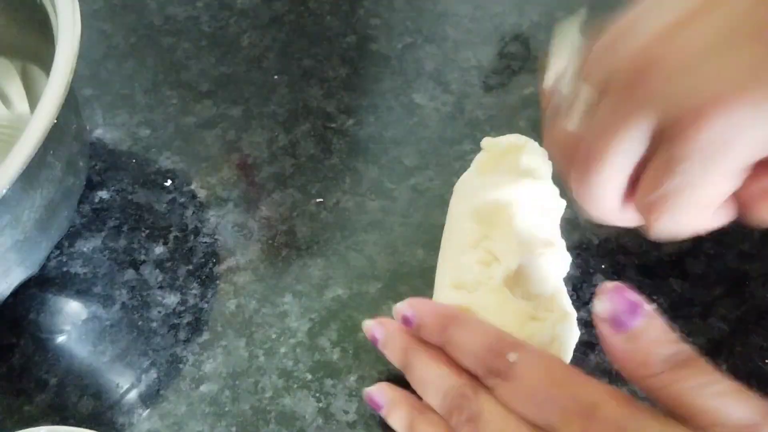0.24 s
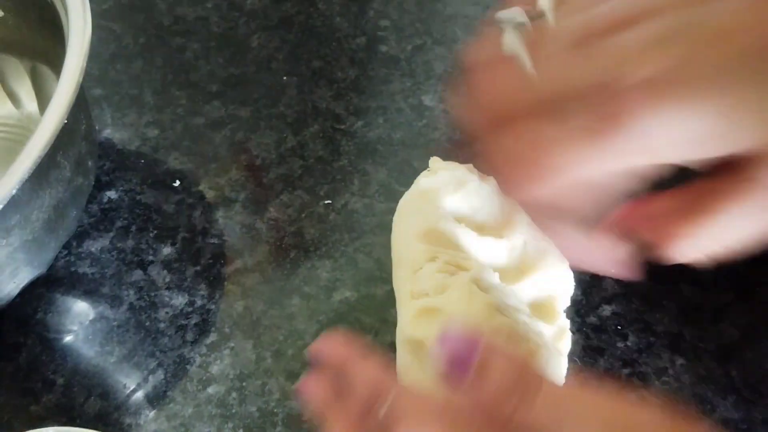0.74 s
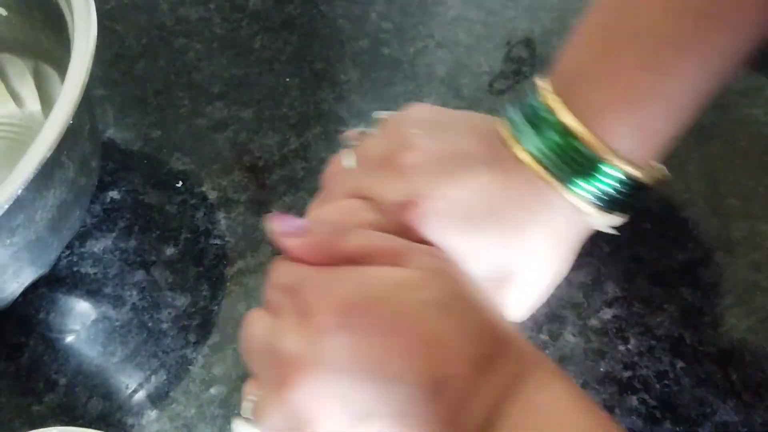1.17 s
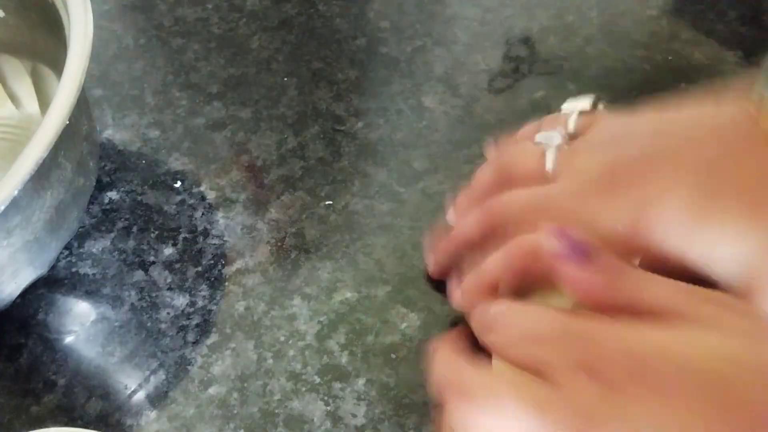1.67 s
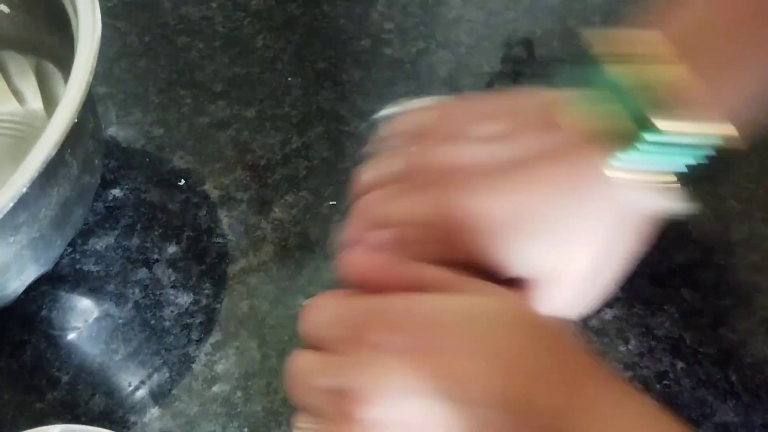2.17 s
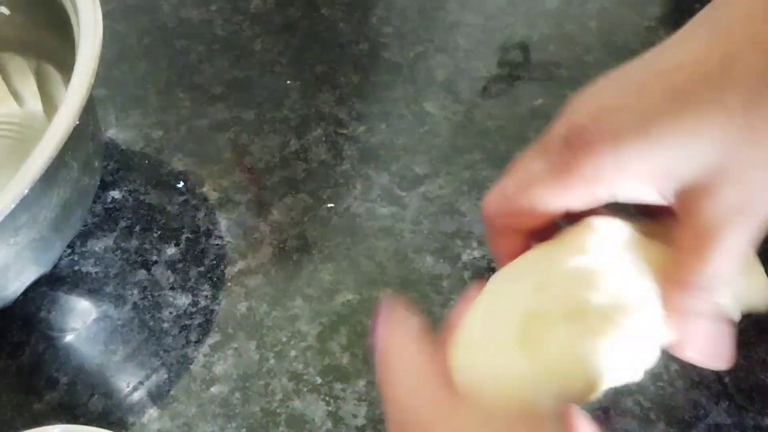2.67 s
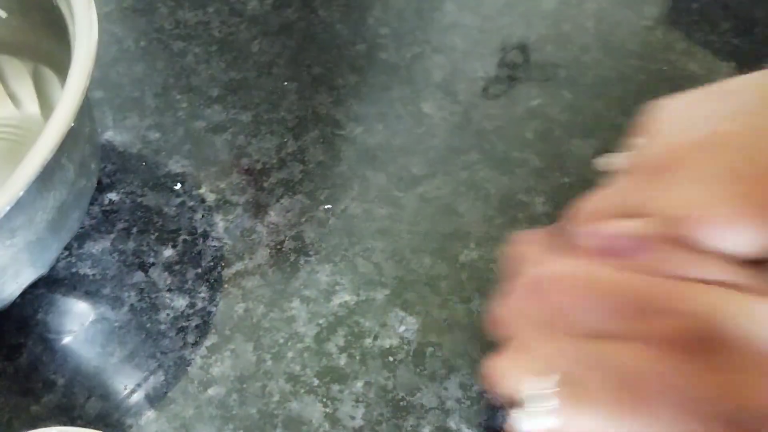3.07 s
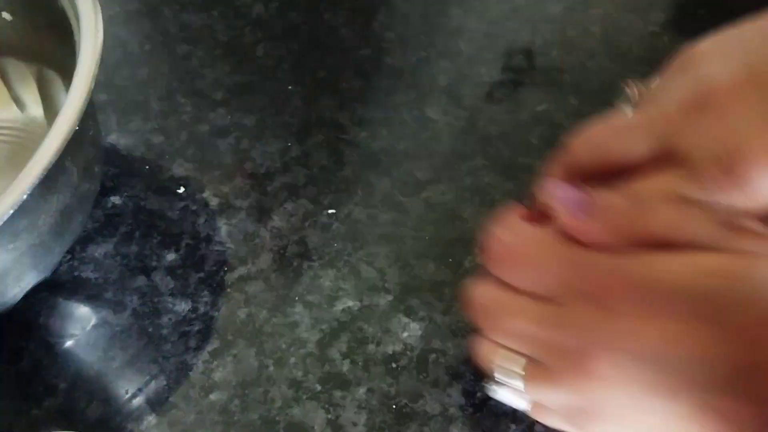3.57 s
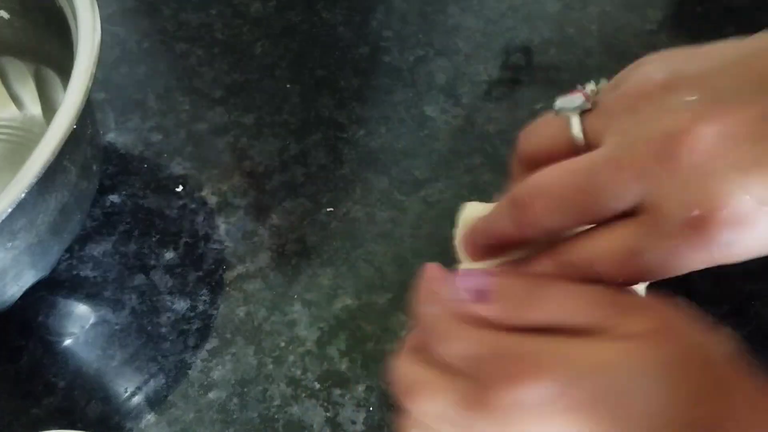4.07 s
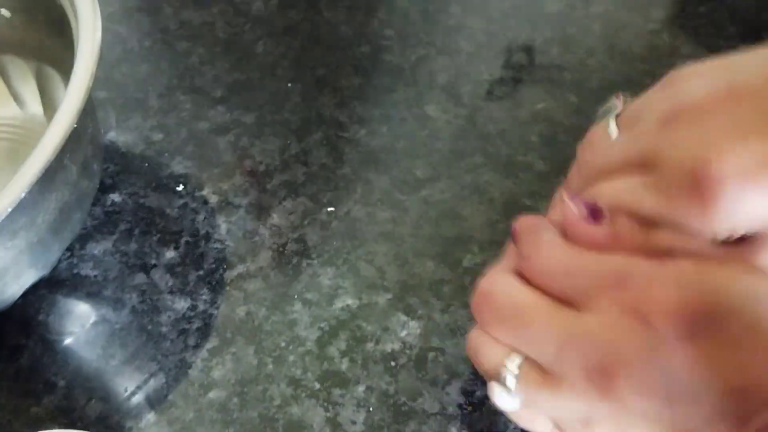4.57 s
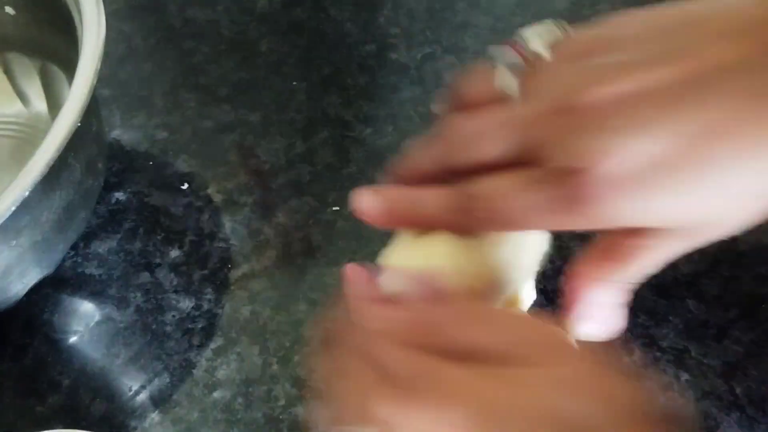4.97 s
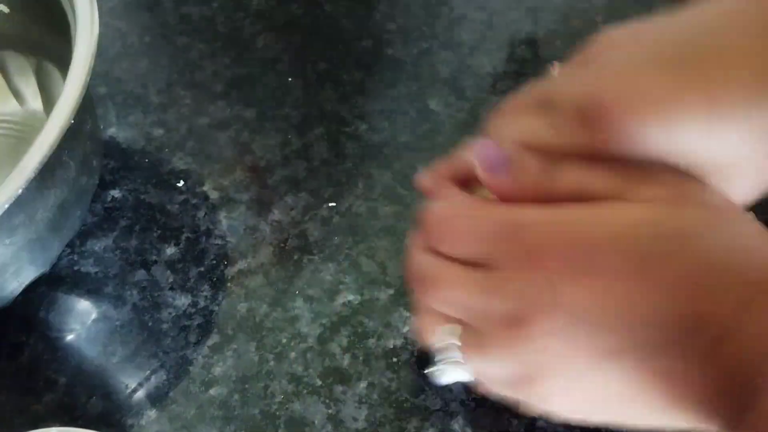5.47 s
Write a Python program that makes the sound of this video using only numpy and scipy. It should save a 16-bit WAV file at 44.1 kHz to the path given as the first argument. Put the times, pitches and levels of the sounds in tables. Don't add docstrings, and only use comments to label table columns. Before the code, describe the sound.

A close phone recording in a small, hard kitchen. A low fan drone and soft treble hiss run throughout, the rumble swelling slightly as hands press dough on a stone counter. Glass bangles clash at once with a bright, brittle clink, then tick lightly until a very hard, overloaded strike at 0.7 seconds. A small hard tick, a finger ring on stone, comes at about 0.97. From 1.24 to 1.38 a dense rattle of rebounds includes a lower metallic ring. Softer clicks follow, then a strong clash with rebounds at 2.07 to 2.15, and another at 2.87 with a touch of metal. After a sparser gap, clinks cluster from 3.45 to 4.0, leading to a sharp strike at 4.07. Quieter clicks continue irregularly at 4.5 to 5.1, with a last small cluster at 5.5 to 5.7. Each dies quickly into grainy shimmer and short reflections; dull knocks stay faint.

```python
import sys
import numpy as np
from scipy import signal
from scipy.fft import rfft, irfft, next_fast_len
from scipy.io import wavfile
from scipy.ndimage import uniform_filter1d

SR = 44100
rng = np.random.default_rng(int(sys.argv[2]) if len(sys.argv) > 2 else 0)


def amplitude_ratio(level_db):
    exponent = np.asarray(level_db, float) / 20
    return 10 ** exponent


def to_wav(sig):
    pcm = np.clip(np.atleast_2d(sig), -1, 1) * 32767
    pcm = np.round(pcm).astype(np.int16)
    wavfile.write(sys.argv[1], SR, pcm.T)


N = 252714

# (frequency [Hz], level [dB])
GLASS_MODES = [(2590, -53), (4400, -25.5), (5110, -28.5), (6850, -7.5), (7780, 1), (9540, -4),
               (11500, -5.5), (13300, -15.5), (15600, -17), (16100, -37), (16500, -47)]


def evened(x):
    return x / np.sqrt(np.mean(x ** 2) + 1e-20)


def read(points, hz):
    f, value = np.transpose(points)
    return np.interp(np.log(hz + 1), np.log(f + 1), value)


def add(mix, s, sound):
    part = mix[round(s * SR):][:len(sound)]
    part += sound[:len(part)]


def ring(hz, db, t60, phase, seconds=.15, rise=.0006):
    t = np.arange(int(seconds * SR))[:, None] / SR
    modes = amplitude_ratio(db - 60 * t / t60) * np.sin(2 * np.pi * (hz * t + phase))
    onset = 1 - np.exp(-(t[:, 0] / rise) ** 2)
    return modes.sum(1) * onset


def hiss():
    # (frequency [Hz], density [dB per Hz])
    spectrum = [(150, -45), (250, -14), (320, -1), (450, -3), (700, -4), (1400, -10), (3000, -15),
                (4200, -14.5), (5500, -9), (6300, -1.5), (8200, 0.5), (10200, -1.5), (12500, -14),
                (14500, -20)]
    level_db, patch_db = -45, 1.1
    frames, hz = N // 128 + 5, np.fft.rfftfreq(512, 1 / SR)
    a, b, patches = rng.standard_normal((frames, 257, 3)).T
    patches = evened(uniform_filter1d(uniform_filter1d(patches, 8, 0), 20, 1))
    z = (a + 1j * b) * amplitude_ratio(read(spectrum, hz)[:, None] + patch_db * patches)
    noise = signal.istft(z, nperseg=512, noverlap=384)[1][:N]
    return amplitude_ratio(level_db) * evened(noise)


def hum():
    # (frequency [Hz], width [Hz], level [dB])
    lines = [(29.8, 18, -61.5), (63.4, 8.2, -63.5), (102.6, 10.8, -56), (151.5, 15, -65.5),
             (168.6, 24, -63), (196.3, 16, -60), (229, 13, -75.5), (249.2, 7.4, -69.5), (319.5, 7.2, -70.5)]
    size = next_fast_len(N)
    hz, noise = np.fft.rfftfreq(size, 1 / SR), rfft(rng.standard_normal(size))
    drone = np.zeros(N)
    for f, width, db in lines:
        resonance = 1 / (1 + (2 * (hz - f) / width) ** 2)
        drone += amplitude_ratio(db) * evened(irfft(noise * resonance, size)[:N])
    return drone


def kneading_swell():
    # (time [s], level [dB])
    pressure = [(0.0, -46.5), (0.06, -48), (0.17, -51.5), (1.21, -53), (1.28, -48), (1.6, -55), (1.76, -51),
                (1.98, -53), (2.01, -47.5), (2.41, -53.5), (2.86, -51.5), (2.87, -48.5), (3.03, -53.5),
                (4.69, -53.5), (4.76, -56.5), (5.14, -51.5), (5.25, -56.5), (5.73, -51)]
    s, db = np.transpose(pressure)
    return amplitude_ratio(0.9 * (np.interp(np.arange(N) / SR, s, db) - db.mean()))


def knock(row, luck):
    s, peak_db, tone_hz, breadth_db = row
    pick, place, phase, when, force = luck
    glass_t60, crack_t60, crack_db = .03, .0045, 3
    hz = 4500 + 11500 * (np.arange(len(place)) + place) / len(place)
    above, below = np.clip((hz - 9000) / 2500, 0, 1), np.clip((7000 - hz) / 1500, 0, 1)
    db = 1.256 * read(GLASS_MODES, hz) - 8 * pick
    db += 0.72 * breadth_db * above + (11.5 + 0.86 * breadth_db) * below
    sound = np.zeros(int(.15 * SR))
    for k in range(3):
        glass = ring(hz[k::3], db[k::3], 0.51 * glass_t60 * (.5 + when[k::3]), phase[k::3], .04)
        crack = ring(hz[k::3], db[k::3] + crack_db, crack_t60, force[k::3], .015, 0.0011)
        add(glass, 0, crack)
        main_hz = tone_hz * (1 + 0.039 * k * (pick[k:k + 1] - .5))
        glass += ring(main_hz, 1.5 - 3 * k, 0.63 * glass_t60, 0, .04)
        bounces = np.append(0, when[k:15:3] ** 1.5)
        pushes = np.append(.7, force[k:15:3] * (1 - 0.57 * when[k:15:3]))
        for after, push in zip(bounces, pushes):
            add(sound, .35 * glass_t60 * after + .0006 * k, push * glass)
    return max(s - .0009, 0), amplitude_ratio(peak_db) * sound / abs(sound).max()


def rustle(near):
    level = abs(uniform_filter1d(near ** 2, 1500, origin=400)) ** 0.3
    band = signal.butter(2, [1200, 6500], "band", fs=SR, output="sos")
    return amplitude_ratio(-39.5) * level * evened(signal.sosfilt(band, rng.standard_normal(N)))


def shimmer(near):
    level_db, t60 = -15.5, 0.34
    keep = amplitude_ratio(-2 * 60 / (t60 * SR))
    level = np.sqrt(signal.lfilter([1 - keep], [1, -keep], near ** 2))
    bursts = rng.exponential(1, N // 64 + 1).repeat(64)[:N]
    grit = rng.standard_normal(N) * bursts
    glassy = irfft(rfft(grit) * amplitude_ratio(read(GLASS_MODES, np.fft.rfftfreq(N, 1 / SR))), N)
    return amplitude_ratio(level_db) * level * evened(glassy)


def kitchen(x):
    # (frequency [Hz], t60 [s])
    decay = [(2000, 0.56), (5280, 0.28), (13900, 0.27)]
    turn_s = 0.24
    out, turn = np.zeros(N), np.arange(N) / SR * 2 * np.pi / turn_s
    for k in range(3):
        taps = np.zeros(SR // 2)
        at = np.arange(120, len(taps) - 20, 20)
        taps[at + rng.integers(0, 20, len(at))] = rng.choice([-1., 1.], len(at))
        hz, t, z = signal.stft(taps, SR, nperseg=128)
        fade = amplitude_ratio(-60 * t / read(decay, hz)[:, None])
        tail = signal.istft(z * fade, SR, nperseg=128)[1]
        share = np.sqrt((1 + np.cos(turn + k * 2 * np.pi / 3)) / 3)
        out += signal.fftconvolve(x * share, tail / np.linalg.norm(tail))[:N]
    return out


def rim(row, luck):
    # (pitch ratio [1], level [dB], share of t60 [1])
    metal = [(.975, -8, .5), (1, -2, 1), (1.014, -5.5, .8), (1.04, -2, .6), (1.08, -19, .7)]
    s, peak_db, hz, t60, upper_db = row
    upper_hz = 11220 * np.array([1, .993])
    ratio, db, share = np.transpose(metal)
    sound = ring(hz * ratio, db - 4 * luck[0, :len(db)], t60 * share, luck[1, :len(db)], rise=0.0018)
    sound += ring(upper_hz, upper_db, 0.5 * t60, luck[2, :2])
    return s - .0004, amplitude_ratio(peak_db + 4.0) * sound / abs(sound).max()


def thump(hz, spread, t60, luck):
    sound = ring(hz * (1 + spread * (luck[0] - .5)), 0, t60, luck[1], .08, 1.1 / hz)
    return sound / abs(sound).max()


def lull_slips(mid, count=24):
    length, turn, quiet_rms = .045, .5, .008
    slips = []
    for when, where, wide in rng.random((count, 3)):
        start, low_hz = when * (N / SR - .1), 5500 * 2.3 ** where
        if mid[round(start * SR):][:round(length * SR)].std() < quiet_rms:
            slips.append((start, length, low_hz, low_hz + 1500 + 1500 * wide, turn))
    return slips


def scene():
    # (time [s], peak [dB], loudest glass tone [Hz], breadth [dB])
    strikes = [(.0004, -14.5, 7370, -12), (0.018, -3.5, 8440, -2), (0.3093, -17, 8000, 10),
               (0.447, -17, 7820, 4), (.641, -17.5, 8230, 11), (0.7156, 2, 7645, 0),
               (1.1119, -15, 9600, -1), (1.2444, -13, 9700, 6), (1.3764, -12, 8680, 6),
               (1.632, -19, 8700, 10), (1.7404, -17.5, 8030, -5), (1.9814, -18.5, 6820, 4),
               (2.0665, -4.5, 11000, 4), (2.5084, -22, 8300, 2), (2.5725, -15.5, 11400, 4.5),
               (2.782, -17, 7470, 3.5), (2.8748, -6, 9010, 3), (3.4538, -11, 8210, -10),
               (3.53, -14, 7980, 3), (3.656, -20, 11470, 7), (3.869, -20, 9570, 3),
               (3.916, -15.5, 8260, -2), (3.9952, -21.5, 7480, 4), (4.0674, -3, 8170, 3),
               (4.5356, -17, 7920, -11), (4.6271, -17, 7780, -2), (4.9165, -16, 7450, -11),
               (5.1082, -22.5, 7170, 5), (5.5147, -15, 7930, -20), (5.608, -15, 8620, 11)]
    # (time [s], peak [dB], loudest glass tone [Hz], breadth [dB])
    rebounds = [(.0219, -8.5, 7650, -25), (0.04, -30, 8440, 3), (.325, -23.5, 7760, 3),
                (0.367, -24, 7500, -1), (0.7243, -5, 7750, -6), (1.2471, -5.5, 9950, 4.5),
                (1.257, -10, 7600, 7), (1.269, -4, 8400, 7), (1.279, -13, 11100, 10), (1.281, -8, 7800, 5),
                (1.2919, -5.5, 7750, 8), (1.2987, -2, 7300, 3), (1.3096, -7, 7700, 5),
                (1.3162, -13.5, 8370, -9), (1.991, -29, 7650, 3), (2.0058, -21, 7700, 6),
                (2.018, -18.5, 7400, 3), (2.03, -30, 7600, 15), (2.071, -6.5, 8690, -1),
                (2.0827, -26, 11300, 7), (2.097, -25, 7900, 7), (2.108, -18, 11200, 6),
                (2.117, -10.5, 11060, 1), (2.13, -18, 8200, 3), (2.14, -7.5, 7980, -1),
                (2.1475, -17, 7770, -5), (2.8807, -7.5, 10920, 13), (3.673, -26.5, 8450, 2),
                (3.9422, -20.5, 8100, -8), (5.6127, -12.5, 11230, 2)]
    # (time [s], peak [dB], loudest glass tone [Hz], breadth [dB])
    ticks = [(.2239, -25.5, 7900, -5), (0.251, -23, 7980, -3), (.356, -22.5, 7830, -4),
             (.3794, -43, 8140, 4), (0.419, -23, 7950, 0), (0.6853, -26, 8700, 6), (.905, -23.5, 7800, 3),
             (.9397, -27, 8100, 8), (1.0301, -32.5, 8300, 5), (1.0912, -22, 9870, -2),
             (1.6494, -30, 9300, -5), (1.679, -28, 8100, 2), (1.722, -22, 9100, 2), (1.8257, -27, 8480, 2),
             (2.4885, -22.5, 7560, 2), (2.554, -23.5, 8560, 7), (2.6763, -30, 8300, 2),
             (3.112, -24, 9220, 0), (3.3505, -23.5, 7460, 7), (3.4846, -29, 8000, -1),
             (4.036, -25.5, 8340, 7), (4.398, -30.5, 9500, -6), (4.587, -29, 8100, -14),
             (4.6594, -37, 8600, -4), (5.042, -23, 7940, -19), (5.138, -22.5, 9330, 5),
             (5.571, -27, 7650, -12), (5.602, -25, 11200, -2), (5.669, -24.5, 7930, -8),
             (5.6925, -24.5, 7900, -7)]
    # (time [s], peak [dB], pitch [Hz], t60 [s], upper partial [dB])
    rims = [(0.018, -37, 4130, 0.034, 0), (0.6864, -55, 3980, 0.06, -8), (1.281, -29, 3980, 0.042, 13),
            (1.2913, -12.5, 3910, 0.032, -3), (1.3254, -43, 4050, 0.06, -1), (1.374, -41, 4130, 0.11, -2),
            (2.142, -29.5, 3980, 0.027, -9.5), (2.8749, -22.5, 3960, 0.033, -4.5),
            (3.11, -50, 4090, 0.054, -7), (3.5295, -35, 4090, 0.02, -9), (4.065, -40, 4040, 0.064, -14),
            (5.109, -46, 4030, 0.043, -10)]
    # (time [s], peak [dB], frequency [Hz], spread [1], t60 [s])
    thumps = [(.716, -39, 2230, 0.22, 0.037), (0.966, -24.5, 5800, .7, 0.0046),
              (0.9696, -22.5, 6170, 0.55, 0.0079), (0.9739, -14.5, 7650, 0.32, 0.0067),
              (1.247, -40, 2170, 0.7, 0.069), (1.269, -41, 2010, 1.26, 0.042),
              (1.292, -38, 1218, 0.36, 0.077), (1.292, -34, 2540, 0.9, 0.016),
              (1.309, -29.5, 1960, 1.04, 0.018), (2.066, -35.5, 2670, 1.04, 0.034),
              (2.084, -44, 2490, 0.98, 0.027), (2.119, -42, 2220, 0.59, 0.055),
              (2.142, -43, 1420, 0.49, 0.075), (2.877, -47.5, 2180, 0.1, 0.042),
              (3.996, -41.5, 4170, 0.13, 0.0093), (4.4, -49, 4130, .2, 0.011)]
    near = np.zeros(N)
    luck = rng.random((120, 5, 48))
    for row, chance in zip(sorted(strikes + rebounds + ticks), luck):
        add(near, *knock(row, chance))
    for row, chance in zip(rims, luck):
        add(near, *rim(row, chance))
    for (s, db, hz, spread, t60), chance in zip(thumps, luck):
        add(near, s - .0003, amplitude_ratio(db) * thump(hz, spread, t60, chance[:, :14]))
    near = near + rustle(near) + shimmer(near)
    air = hiss()
    low_air = signal.lfilter(*signal.butter(1, 1200, fs=SR), air)
    rumble = kneading_swell() * (low_air + hum())
    mono = near + amplitude_ratio(-6.0) * kitchen(near) + air - low_air + rumble
    return np.array([mono, mono])


def low_pass(x):
    return signal.sosfilt(signal.butter(12, 16820, fs=SR, output="sos"), x)


def record(dry):
    # (start [s], length [s], low edge [Hz], high edge [Hz])
    slips = [
        (.716, .08, 9750, 10450),
        (.716, .04, 13000, 14200),
        (.76, .04, 10500, 12000),
        (1.25, .035, 10300, 11200),
        (1.25, .05, 13000, 13500),
    ]
    lowpass = signal.firwin(511, 15750, window=("kaiser", 9), fs=SR)
    mid = np.clip(signal.oaconvolve(dry[0], lowpass, "same"), -1, 1)
    side = np.zeros(N)
    for start, length, low_hz, high_hz, turn in [(*row, 1) for row in slips] + lull_slips(mid):
        part = mid[round(start * SR):round((start + length) * SR)]
        bandpass = signal.butter(8, [low_hz, high_hz], "band", fs=SR, output="sos")
        band = signal.sosfiltfilt(bandpass, part)
        angle = turn * np.pi / 2 * signal.windows.tukey(len(part), .4)
        add(mid, start, (np.cos(angle) - 1) * band)
        add(side, start, np.sin(angle) * np.roll(band, 60))
    mix = np.clip([mid + side, mid - side], -1, 1)
    return low_pass(mix)


dry = scene()
out = record(dry)
to_wav(out)
```